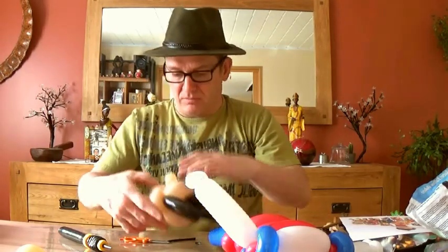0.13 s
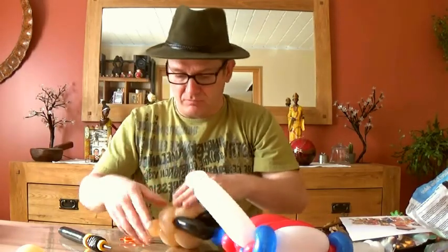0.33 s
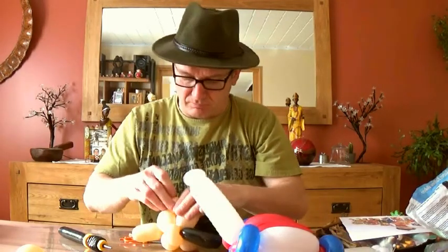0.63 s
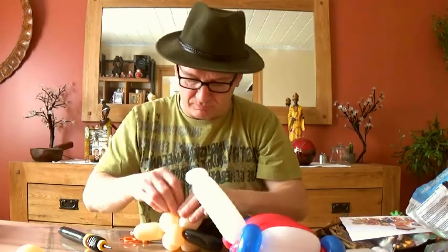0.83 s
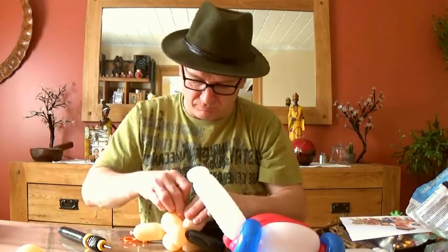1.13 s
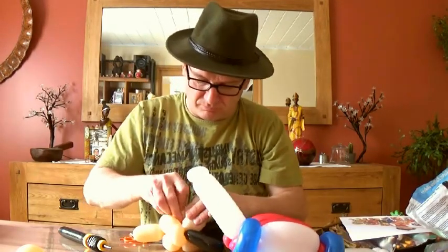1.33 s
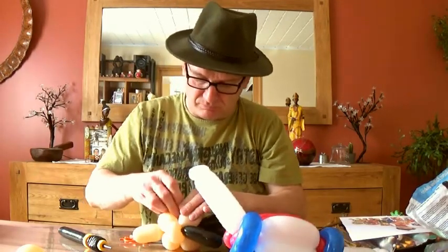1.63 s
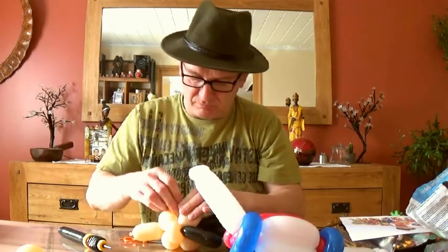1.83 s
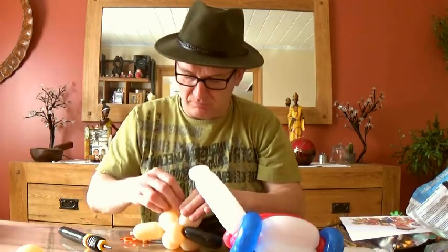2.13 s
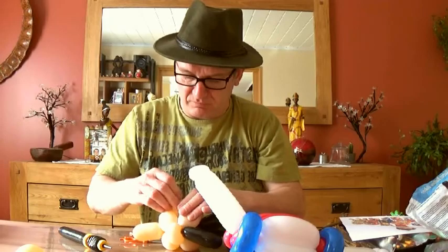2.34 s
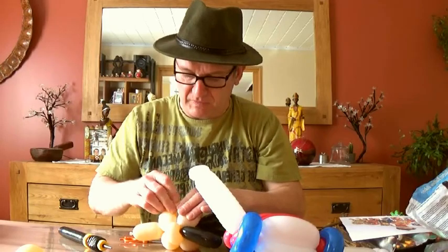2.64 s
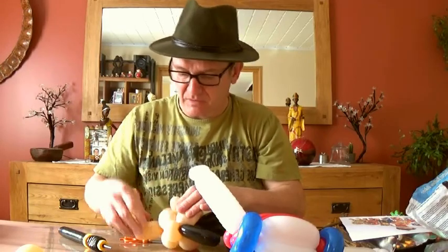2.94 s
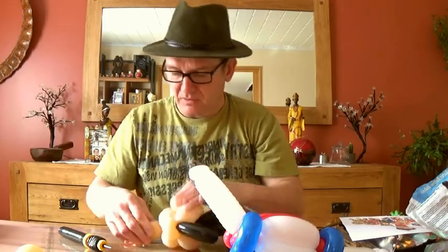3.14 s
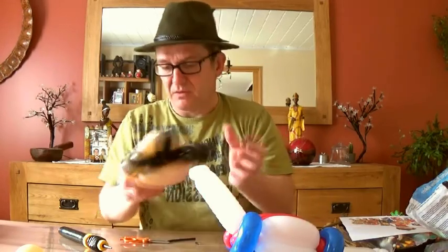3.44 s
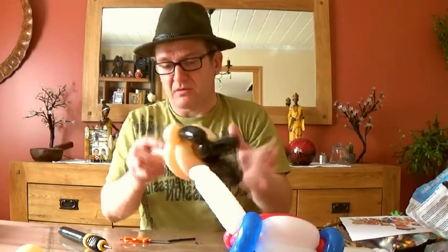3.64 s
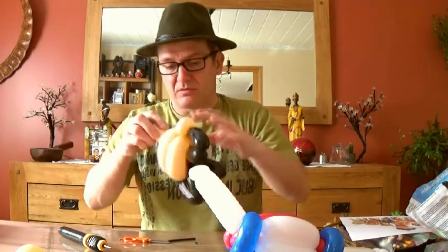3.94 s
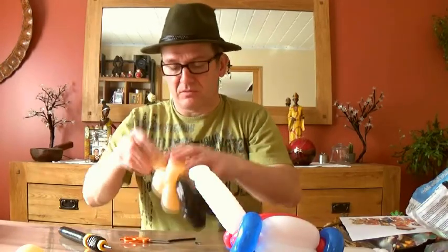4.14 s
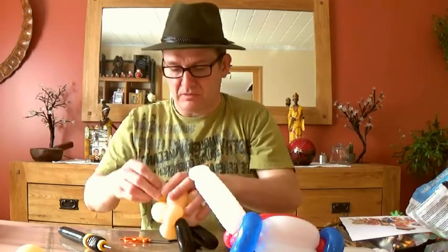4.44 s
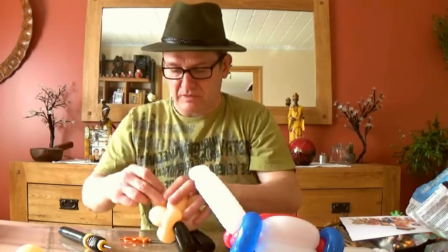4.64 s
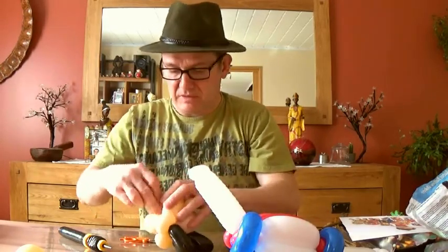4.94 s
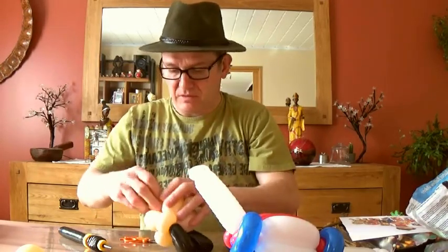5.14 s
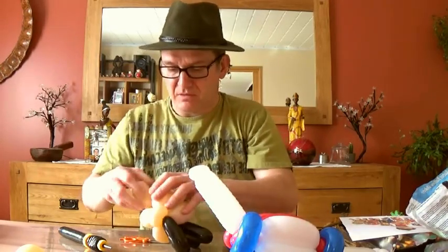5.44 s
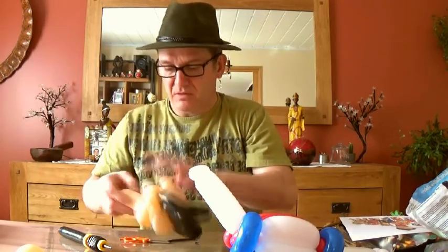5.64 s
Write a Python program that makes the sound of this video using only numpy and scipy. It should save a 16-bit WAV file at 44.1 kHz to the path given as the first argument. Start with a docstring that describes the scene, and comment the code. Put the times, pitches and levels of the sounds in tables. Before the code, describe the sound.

Latex balloons are twisted together close by in a room, rasping and crackling with sharp snaps, short squeaks and brief quiet lulls.

```python
"""Stick-slip friction of twisted balloons

Long latex balloons are twisted together at a table, about a metre away in a furnished room.
Rubber sticks and slips: dense slips make a rasping crackle, single ones snap, steady ones squeak.
Rubbing and snaps excite resonances of the skin (bright, short) and of the enclosed air (lower);
squeaks are sums of harmonics. An echo and a quiet room tone surround them."""
import sys
import numpy as np
from scipy import signal
from scipy.fft import rfft, irfft, next_fast_len
from scipy.io import wavfile
from scipy.ndimage import uniform_filter1d, map_coordinates

SR = 44100
rng = np.random.default_rng(int(sys.argv[2]) if len(sys.argv) > 2 else 0)


def to_wav(s):
    """Save 16-bit WAV."""
    ch = np.atleast_2d(s).T  # columns
    pcm = np.round(np.clip(ch, -1, 1) * 32767)  # PCM
    wavfile.write(sys.argv[1], SR, pcm.astype(np.int16))


N = 254898

# Spectrum of the room tone and preamp hiss as heard after the microphone: (frequency [Hz], density [dB per Hz])
HUSH_SPECTRUM = [(15, -76), (25, -38), (363, -6.5), (529, 8), (588, -9), (1280, -16), (9770, -13),
                 (13100, -26), (15000, -69)]
HUSH_DB = -49  # rms level ahead of the microphone
# Decay time of the room's tail: (frequency [Hz], time to fall 60 dB [s])
ROOM_DECAY = [(200, 1), (1500, 0.1), (5000, 0.45), (12000, 0.16)]
# Gain of the echo: (frequency [Hz], level [dB])
ROOM_GAIN = [(100, -48), (400, -17.5), (1500, -8), (4000, -7), (8000, -9), (13000, -30)]
# Response of the microphone: (frequency [Hz], level [dB])
MICROPHONE_RESPONSE = [(25, -15), (130, -29), (300, -15), (600, 0), (11000, -3.5), (13000, 1), (14500, -22),
                       (15300, -37)]
TOP_HZ = 15380  # upper band limit

# Steady stick-slip tones:
# (time [s], length [s], start frequency [Hz], end frequency [Hz], level [dB], overtone share [ratio])
SQUEAK_TONES = [(0.678, 0.038, 1600, 1510, -27, 0.3), (0.745, 0.024, 2810, 2830, -23, 0.2),
                (0.942, 0.056, 1687, 2070, -24, 0.3), (2.23, 0.25, 507, 562, -39.5, .4),
                (2.254, 0.054, 2790, 2780, -24, 0.6), (2.374, 0.1, 2770, 2700, -26, 0.4),
                (2.493, 0.08, 1102, 1143, -30, 0.5), (2.5, 0.117, 530.5, 537, -27, 0.2),
                (2.945, 0.032, 1140, 1200, -36, 0.78), (3.366, 0.067, 1634, 1666, -34.5, 0.92),
                (3.555, 0.042, 1490, 1500, -37.5, .2), (3.571, 0.093, 740, 767, -36, 0.7),
                (3.648, 0.086, 958, 953, -42, 1.05), (3.716, 0.057, 796, 803, -38.5, 1),
                (3.715, 0.045, 2010, 2180, -37, 0.46), (4.137, 0.17, 1310, 1280, -43.5, 0.1),
                (4.529, 0.065, 1008, 1144, -27.5, 0.7), (4.53, 0.051, 1775, 1866, -21.5, 0.6),
                (1.317, 0.039, 1564, 1562, -20.5, 0.1), (5.074, 0.029, 2150, 2190, -22, .2),
                (5.173, 0.063, 1564, 1540, -24.5, 0.1), (5.267, 0.057, 1560, 1290, -28, 0.1),
                (5.343, 0.12, 417, 413.5, -27, 0.4), (5.683, 0.059, 2060, 1840, -21.5, 0.1)]

# Loudest single slips, levels ahead of the resonator gains:
# (time [s], skin flick level [dB], air knock level re flick [dB])
SINGLE_SNAPS = [(0.0152, -24, -10), (0.1106, -30, -8), (0.1253, -28, -7), (0.1344, -34, 1),
                (0.193, -10, -13), (0.2046, -20, 1), (0.217, -23, -4), (0.2264, -25, -6), (0.2554, -24, -7),
                (0.2624, -24, -7), (0.2714, -26, -4), (0.2785, -13, -16), (0.284, -12, -14),
                (0.2934, -17, -14), (0.2976, -16, -14), (0.301, -17, -19), (0.384, -17, -4),
                (0.3932, -13, -12), (0.4736, -18, -4), (0.555, -19, -13), (0.574, -20, -6),
                (0.612, -12, -7), (0.624, -10, -3.5), (0.782, -17, -11), (0.8245, -12, -4.5),
                (0.9463, -3.5, -15), (1.009, -2, -16.5), (1.0158, -13, -12), (1.0234, -3.5, -15),
                (1.0403, -8, -11), (1.0523, -5, -21), (1.0699, -2, -22), (1.0832, -7, -21),
                (1.0877, -6, -22), (1.0978, -6, -18), (1.7302, -10, -13), (1.8437, -22, -12),
                (1.9843, -13.5, -11), (1.9939, -13, -15), (2.0448, -21, -10), (2.0917, -13, -18),
                (2.0935, -19, -12), (2.178, -5, -13), (2.2024, -12, -16), (2.209, -10, -12),
                (2.3834, -8, -9), (2.3925, -6.5, -18), (2.4045, -12, -12), (2.476, -18, -14),
                (2.4801, -4, -8), (2.684, -13, -19), (2.6874, -6.5, -9), (2.822, -31, -10),
                (2.9117, -27, -9), (2.9186, -23, -15), (3.0139, -13.5, -20), (3.0552, -9.5, -18),
                (3.0772, -15, -20), (3.1181, -15, -21), (3.1378, -26, -19), (3.1586, -21, -11),
                (3.1664, -18.5, -17), (3.2321, -23, 0), (3.3712, -34, -7), (3.4654, -8.5, -16),
                (3.7095, -33, -4), (3.8073, -15, -8), (3.9007, -23, -5), (3.92, -17.5, -2),
                (4.0243, -33, -9), (4.127, -30, -5), (4.1953, -19, -17), (4.2365, -18, -15),
                (4.3014, -21, -11), (4.3281, -18, -13), (4.348, -13, -10), (4.4017, -12, -8),
                (4.6134, -6, -7), (4.632, -7, -17), (4.6608, -5, -13), (4.6902, -4, -14), (4.792, -12, -13),
                (4.8727, -2, -15), (4.9147, -13, -16), (4.921, -8, -12), (4.934, -5, -17),
                (4.9637, -3, -17), (5.1624, -17, -12), (5.5662, -29, 1), (5.6064, -9.5, -14),
                (5.6172, -10.5, -14), (5.629, -12, 1), (5.6407, -14, -11), (5.6454, -4.5, -12),
                (5.664, -9, -8), (5.689, -10, -7), (5.7714, -13, -11), (5.7754, -14, -11)]
# Runs of nearly evenly spaced slips, levels likewise:
# (time [s], length [s], first rate [1/s], last rate [1/s], flick level [dB], knock level re flick [dB])
CREAK_RUNS = [(.137, .052, 95, 165, -30, 1), (0.579, 0.019, 247, 300, -16, 3),
              (.637, 0.037, 214, 140, -14, -16), (1.157, 0.042, 190, 350, -13, -15),
              (1.66, 0.09, 180, 290, -28, -14), (2.941, 0.033, 500, 430, -28, -10),
              (4.333, 0.043, 260, 330, -16.5, -17), (4.49, 0.052, 680, 610, -31, -12),
              (4.53, .046, 1100, 910, -20, -14), (5.028, 0.048, 150, 310, -14, -7)]
CREAK_JITTER = 0.04  # standard deviation, as a share of the gap at the last rate
# Bursts of irregular slips: (time [s], length [s], rate [1/s], mean flick level [dB])
FLURRY_BURSTS = [(.195, 0.055, 100, -26), (0.993, .06, 70, -19), (2.103, 0.11, 60, -11.5),
                 (4.583, 0.083, 130, -19), (4.702, 0.11, 76, -12), (4.891, .1, 94, -13),
                 (5.28, 0.17, 36, -30)]
FLURRY_SPREAD_DB, FLURRY_KNOCK_DB = 2.5, -26.5  # spread of flick and knock; mean knock re flick
RASP_DB, RASP_FOLLOWS = -4, 0.3  # a snap's rasp re flick; share of its knock level added to that

# Resonances of the balloons, low to high: (frequency [Hz], width [Hz], level [dB])
LOW_LOBE_MODES = [(301, 120, -1), (356.7, 6, -0.5), (423, 52, -4.5), (542.5, 21.4, 2.5), (592, 157, -5.5)]
AIR_MODES = [(910, 230, -4), (1112, 34, 4.5), (1243, 277, -2), (1737, 423, 2.5), (2425, 990, -3.5),
             (2780, 53, 0.5)]
CONTACT_MODES = [(2910, 1290, -2.5), (4380, 1230, 1.5), (5124, 1990, -2.5)]
FILM_MODES = [(6660, 2200, 0), (8620, 2130, 0.013)]
SKIN_MODES = [(9340, 2020, -2), (10820, 3020, -2.5), (12180, 5500, -11)]

# Rubbing strokes, one inner table each: (time [s], air level [dB], treble level re air [dB])
RUB_STROKES = [
    [(0.02, -42, -5), (0.024, -43, -7), (0.105, -53, -11)],
    [(0.11, -43, -10), (0.136, -45, -10), (0.15, -38.5, -22), (0.198, -32, -13), (0.242, -30.5, -11),
     (0.25, -36.5, -14), (0.27, -35, -13)],
    [(0.275, -30, -7), (0.369, -45.5, 0), (0.399, -32.5, -8.5), (0.465, -46.5, -1), (0.473, -34.5, -8.5),
     (0.551, -49.5, 10), (0.575, -38.5, -2)],
    [(0.582, -29, -6), (0.59, -27, -1), (0.628, -29, -7), (0.64, -29, -7), (0.696, -28, 10.5),
     (0.738, -22.5, 0.5), (0.86, -32, -4.5)],
    [(0.87, -26.5, -4), (0.92, -24, 2.5), (1.038, -25, 3.5), (1.082, -34, 6), (1.124, -26, 1),
     (1.176, -32, 11.5), (1.2, -29, 13)],
    [(1.21, -27.5, 8.5), (1.222, -20, 1.5), (1.33, -22.5, 1.5), (1.342, -20.5, -3), (1.362, -22.5, -2),
     (1.558, -23, 4.5), (1.6, -19, -4)],
    [(1.62, -19, -0.5), (1.71, -29.5, 6), (1.764, -23.5, 5), (1.862, -24.5, -3), (1.878, -30, 2.5),
     (1.956, -35, -1.5), (1.97, -36, -10)],
    [(1.98, -41, 2), (1.984, -35, -4), (1.998, -26.5, 2.5), (2.028, -36.5, -4), (2.05, -30, 3),
     (2.085, -33.5, 0)],
    [(2.092, -30, 8.5), (2.106, -24, 1), (2.168, -25.5, -1), (2.184, -31, 1.5), (2.326, -24, 8.5),
     (2.346, -21.5, -0.5), (2.45, -32.5, -3)],
    [(2.46, -29.5, 4), (2.564, -22.5, 4.5), (2.664, -27, -2.5), (2.686, -23, -3), (2.792, -38.5, -11),
     (2.828, -39.5, 1), (2.905, -45.5, -7)],
    [(2.915, -48, 7), (2.919, -36.5, 4), (2.957, -38, 3), (3.045, -41.5, -6), (3.053, -37, -2),
     (3.133, -45.5, 3), (3.16, -45, 1)],
    [(3.168, -32, -8), (3.194, -44, -6), (3.23, -36, -5), (3.286, -44.5, -1), (3.304, -38, -10),
     (3.314, -41.5, -1), (3.365, -47.5, 2)],
    [(3.372, -32.5, -1.5), (3.432, -35, -4.5), (3.46, -32.5, -10), (3.466, -31, -3), (3.506, -40, -6),
     (3.544, -38.5, -13), (3.56, -40, 0)],
    [(3.575, -35, -11), (3.605, -39, -11), (3.643, -33.5, -6), (3.707, -32.5, -5.5), (3.713, -29.5, -6),
     (3.767, -37.5, -18), (3.8, -40, -19)],
    [(3.808, -27.5, -3), (3.882, -37, -13), (3.914, -32.5, -2), (4.004, -41.5, -20), (4.016, -40.5, 1.5),
     (4.16, -45, -15), (4.19, -56, 6)],
    [(4.197, -37, 6), (4.213, -33.5, 0), (4.227, -41.5, 5), (4.239, -31.5, 9.5), (4.299, -29.5, 2),
     (4.32, -30.5, -4)],
    [(4.33, -30, 1), (4.342, -29.5, -1), (4.408, -23, -2), (4.57, -24.5, 3), (4.576, -24.5, -6),
     (4.602, -23, -0.5), (4.68, -22.5, -4.5)],
    [(4.7, -25, -1), (4.71, -26, 4), (4.746, -21, 0), (4.768, -25.5, -1), (4.832, -20.5, 3),
     (4.854, -25.5, 5), (5.02, -25, -1.5)],
    [(5.03, -28.5, 7), (5.086, -22.5, 4), (5.342, -23, 1.5), (5.482, -35.5, 0.5), (5.546, -46, 0),
     (5.564, -38.5, -4), (5.6, -46, -7.5)],
    [(5.608, -33, 3), (5.668, -26.5, -7), (5.68, -34.5, -5), (5.69, -25, 1.5), (5.738, -17.5, -4.5),
     (5.76, -25.5, -6), (5.78, -21, -5)],
]
# Level of the low lobes re air: (time [s], level [dB])
LOW_LOBE_LEVEL = [(0, -18), (.2, -14), (.35, 5), (.52, -15), (.62, -1.5), (.85, -9.5), (1, -3.5),
                  (1.17, -8.5), (1.3, -2.5), (1.7, -10.5), (1.82, -2), (2.05, -9), (2.12, 2), (2.42, -8.5),
                  (2.6, -4), (3.1, -11), (3.2, -2), (3.42, -30), (3.5, -4), (3.8, -46), (4.2, -10),
                  (4.4, -7), (4.7, -9), (5, -3), (5.25, -7.5), (5.5, 0.5), (5.68, -2.5), (5.78, -37)]
# Colour of the treble, skin fizz over film hiss: (time [s], level [dB])
TREBLE_TILT_LEVEL = [(0, -3), (.3, 4), (.5, 2), (.7, 4), (.8, 2), (1, 3), (1.2, 1.5), (1.55, 5), (1.8, 0),
                     (2.05, 0), (2.15, 3), (2.55, 5), (2.8, -6), (3.1, 1), (3.4, 3), (3.8, 1), (4.05, 0),
                     (4.24, -5), (4.3, -9), (4.35, -2), (4.5, -9), (4.85, -0.5), (5.05, -2.5), (5.3, -1),
                     (5.5, -7.5), (5.78, -6)]
# Further gain of the rubbing's rasp: (time [s], level [dB])
RASP_SWELL_LEVEL = [(0, -0.5), (.3, -0.5), (.59, -0.5), (.75, 0.5), (1.1, 3), (1.4, -0.5), (2, 0.5),
                    (2.9, 3.5), (3.3, 0), (3.55, -1.5), (3.72, 3.5), (3.85, 0), (3.92, 5), (4.15, -1.5),
                    (4.24, 2.5), (4.3, 4.5), (4.33, -6), (4.45, -0.5), (5, -0.5), (5.78, 0.5)]
# Resonators above the air: (level re air [dB], share of the treble swing followed [ratio])
CONTACT_FOLLOWS, FILM_FOLLOWS, SKIN_FOLLOWS = (0, 0.36), (-1.3, 0.95), (-1.15, 1.08)


def amp(db):
    """Logarithmic level: decibels become an amplitude ratio."""
    return 10 ** (np.asarray(db) / 20)


def unit(x):
    """Normalisation to a root-mean-square of one."""
    return x / np.sqrt(np.mean(x ** 2) + 1e-20)


def along(points, hz):
    """Interpolation of (frequency, value) points on a logarithmic frequency axis."""
    point_hz, value = np.transpose(points)
    return np.interp(np.log(hz + 1), np.log(point_hz + 1), value)


def filtered(x, response):
    """Linear filtering: the spectrum is multiplied by a complex frequency response."""
    m = next_fast_len(N + SR // 2)
    hz = np.fft.rfftfreq(m, 1 / SR)
    return irfft(rfft(x, m) * response(hz), m)[..., :N]


def ringing(x, modes):
    """Modal superposition: a bank of damped resonances answers in parallel, with alternating sign."""
    def response(f):
        total = 0
        for k, (centre, width, db) in enumerate(modes):
            damping = 1j * f * width
            total = total + (-1) ** k * amp(db) * damping / (centre * centre - f * f + damping)
        return total
    return filtered(x, response)


def shudder(pushes, decay_s):
    """Decaying friction chatter: every push lets the rubber move to and fro for a moment."""
    fade = np.exp(-np.arange(SR // 20) / SR / max(decay_s, 1e-4))
    random_sign = np.sign(rng.standard_normal(N))
    return signal.fftconvolve(pushes, fade)[:N] * random_sign


def hush():
    """Stationary background noise: mostly common to both sides, with a small independent part."""
    noise = rng.standard_normal(N) + 0.19 * rng.standard_normal((2, N))
    # the microphone response is divided out here, as record() applies it again
    shaped = filtered(noise, lambda hz: amp(along(HUSH_SPECTRUM, hz) - along(MICROPHONE_RESPONSE, hz)))
    return amp(HUSH_DB) * unit(shaped)


def room(x):
    """Reverberation: walls and table answer with noise tails, independent per side, new as the hands move."""
    out = np.zeros((2, N + SR))
    step = SR // 4
    for start in range(0, N, step):
        hz, t, z = signal.stft(rng.standard_normal((2, SR // 2)), SR, nperseg=256)
        z = z * amp(-60 * t / along(ROOM_DECAY, hz)[:, None])
        # equal energy in every band, however quickly it decays
        z = z / np.linalg.norm(z, axis=2, keepdims=True)
        z = z * np.sqrt(np.mean(np.abs(z[..., 1]) ** 2))
        tail = signal.istft(z, SR, nperseg=256)[1]
        tail = tail / np.linalg.norm(tail[0])
        wet = signal.fftconvolve(x[None, start:start + step], tail, axes=1)
        out[:, start + 130:][:, :wet.shape[1]] += wet  # the echo starts 130 samples late
    return filtered(out[:, :N], lambda hz: amp(along(ROOM_GAIN, hz)))


def squeaks():
    """Periodic stick-slip: slips in step give a short unsteady tone with a geometric overtone series."""
    out = np.zeros(N + SR)
    for s, length, start_hz, end_hz, db, share in SQUEAK_TONES:
        n = round(length * SR)
        drift, flutter = (unit(uniform_filter1d(rng.standard_normal(SR // 4), size=300))[:n]
                          for _ in range(2))
        glide_hz = np.linspace(start_hz, end_hz, n) * (1 + 0.0155 * drift)
        phase = 2 * np.pi * np.cumsum(glide_hz) / SR
        tone = sum(share ** k * np.sin((k + 1) * phase + k * k) for k in range(5))
        envelope = np.sin(np.linspace(0, np.pi, n)) ** 0.11  # nearly flat, with quick ends
        out[round(s * SR):][:n] += amp(db + 1.2 * flutter) * envelope * tone
    return out[:N]


def creak_rows():
    """Quasi-periodic relaxation: each run is spelled out as single slips, nearly alike."""
    rows = []
    for s, length, first_hz, last_hz, db, knock_db in CREAK_RUNS:
        turns = np.cumsum(np.linspace(first_hz, last_hz, round(length * SR))) / SR
        at = s + np.flatnonzero(np.diff(np.floor(turns))) / SR  # one slip per whole turn
        chance = rng.standard_normal((60, 2))[:len(at)]
        for t, (delay, size) in zip(at, chance):
            rows.append((t + CREAK_JITTER / last_hz * delay, db + 1.6 * size, knock_db))
    return rows


def flurry_rows():
    """Poisson process: slips follow at exponential gaps, with random size and knock."""
    rows = []
    for s, length, rate_hz, db in FLURRY_BURSTS:
        gap = rng.exponential(size=40)
        size, knock = FLURRY_SPREAD_DB * rng.standard_normal((2, 40))
        at = np.cumsum(gap) / rate_hz
        rows += [(s + t, db + a, FLURRY_KNOCK_DB + b) for t, a, b in zip(at, size, knock) if t < length]
    return rows


def snaps():
    """Impulse response: a single slip flicks the skin sharply, and the enclosed air carries on a knock."""
    rows = list(SINGLE_SNAPS) + creak_rows() + flurry_rows()
    s, flick_db, knock_db = np.transpose(rows)
    rasp_db = RASP_DB + RASP_FOLLOWS * knock_db

    def struck(modes, db, decay_s):
        """Impact excitation: the release itself and its chatter drive one resonator."""
        pushes = np.bincount(np.round(s * SR).astype(int), amp(db), N)[:N]
        return ringing(3 * pushes + 0.94 * shudder(pushes, decay_s), modes)

    return (struck(SKIN_MODES, flick_db + 8.5, decay_s=0.0011)
            + struck(FILM_MODES, flick_db + 2.0, decay_s=0.0011)
            + struck(CONTACT_MODES, flick_db + rasp_db + 7.5, decay_s=0.00096)
            + struck(AIR_MODES, flick_db + knock_db + 12, decay_s=0.00086))


def slipping(rate_hz, wander_db, jitter):
    """Relaxation oscillation: at one contact patch tension builds and lets go at a wandering rate."""
    wander = map_coordinates(rng.standard_normal(N // 2000 + 4), [np.arange(N) / 2000])
    growth = rate_hz * amp(wander_db * wander) / SR
    tension = np.cumsum(growth + jitter / 20 * rng.standard_normal(N))
    return np.diff(np.floor(np.maximum.accumulate(tension)), prepend=0) > 0  # a slip at each whole unit


def patchy(x, depth_db):
    """Time-varying spectrum: a random gain field shifts the colour as the lobes are squeezed."""
    z = signal.stft(x, nperseg=256)[2]
    field = uniform_filter1d(rng.standard_normal(z.shape), size=3, axis=0)  # over frequency
    field = uniform_filter1d(field, size=24, axis=1)  # over time
    return signal.istft(z * amp(depth_db * unit(field)), nperseg=256)[1][:N]


def rubbing():
    """Source and resonator: slips of two patches reach five resonators, each at its own strength."""
    s, air_db, treble_db = np.transpose(np.concatenate(RUB_STROKES))
    t = np.arange(N) / SR
    air_db, treble_db = np.interp(t, s, air_db), np.interp(t, s, treble_db)
    low_db = np.interp(t, *np.transpose(LOW_LOBE_LEVEL))
    tilt_db = np.interp(t, *np.transpose(TREBLE_TILT_LEVEL))
    rasp_db = np.interp(t, *np.transpose(RASP_SWELL_LEVEL))
    times = (slipping(rate_hz=330, wander_db=3, jitter=0.4)
             | slipping(rate_hz=600, wander_db=4, jitter=0.6))
    slips = times * amp(3.1 * rng.standard_normal(N))

    def above(follows):
        """Level rule: an offset from the air plus a share of the treble swing."""
        offset_db, share = follows
        return air_db + offset_db + share * treble_db

    def voice(modes, db, decay_s, smooth, patchy_db):
        """Forced resonance: slips, chatter and hiss drive one resonator at a moving level."""
        pushes = slips * amp(0.88 * rng.standard_normal(N))
        chatter = unit(1.18 * pushes + shudder(pushes, decay_s))
        drive = chatter + smooth * rng.standard_normal(N)  # countless tiny slips merge into hiss
        return amp(db) * unit(ringing(patchy(drive, patchy_db), modes))

    low_level, contact_level = air_db + low_db, above(CONTACT_FOLLOWS) + rasp_db
    film_level = above(FILM_FOLLOWS) - tilt_db / 2
    skin_level = above(SKIN_FOLLOWS) + tilt_db / 2
    return (voice(AIR_MODES, air_db, decay_s=0.00076, smooth=1.0, patchy_db=2.5)
            + voice(LOW_LOBE_MODES, low_level, decay_s=0.0011, smooth=0.87, patchy_db=0.5)
            + voice(CONTACT_MODES, contact_level, decay_s=0.00027, smooth=1.0, patchy_db=2.0)
            + voice(FILM_MODES, film_level, decay_s=0.00012, smooth=0.51, patchy_db=3.5)
            + voice(SKIN_MODES, skin_level, decay_s=0.00026, smooth=0.56, patchy_db=1.0))


def scene():
    """Superposition: the balloons a little left of centre, their echo, and the room tone."""
    balloons = rubbing() + snaps() + squeaks()
    direct = balloons * amp([[0.45], [-0.45]])  # left and right [dB]
    return direct + room(balloons) + hush()


def record(dry):
    """Transduction: a microphone thin in the bass, a preamp that rounds peaks lopsidedly, a band limit."""
    x = filtered(dry, lambda hz: amp(along(MICROPHONE_RESPONSE, hz)))
    x = x / (1 + np.abs(x / 0.72) ** 5) ** (1 / 5)  # peaks approach 0.72
    x = x + 0.007 * x * x  # slight asymmetry
    return filtered(x, lambda hz: (hz > 15) * (hz < TOP_HZ))


dry = scene()
out = record(dry)
to_wav(out)
```